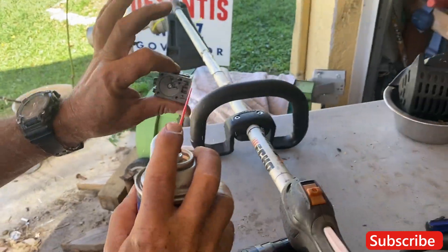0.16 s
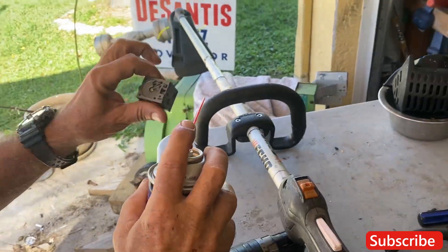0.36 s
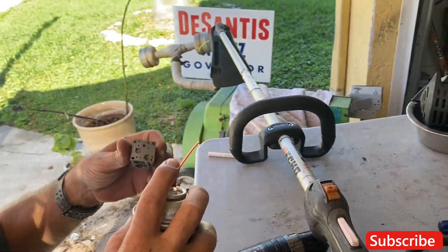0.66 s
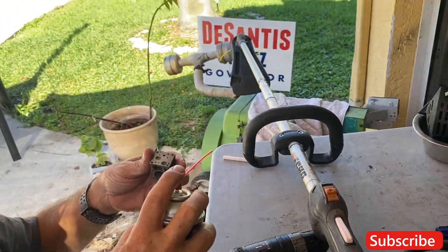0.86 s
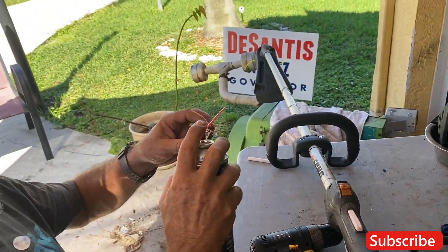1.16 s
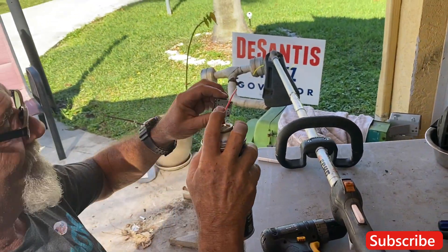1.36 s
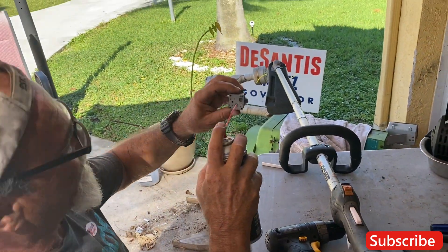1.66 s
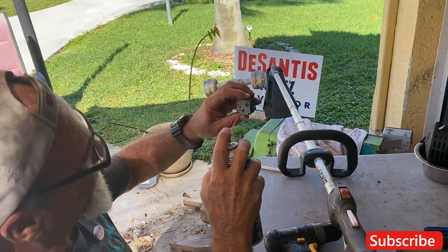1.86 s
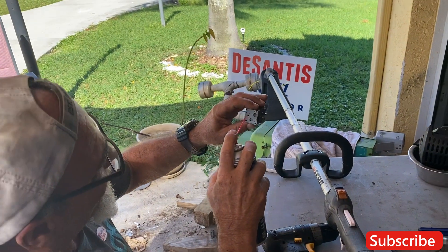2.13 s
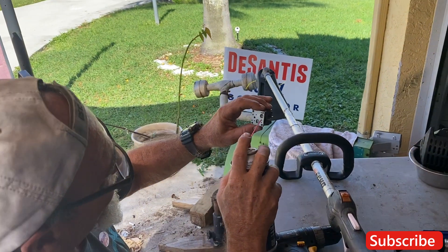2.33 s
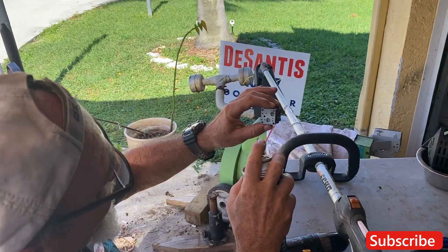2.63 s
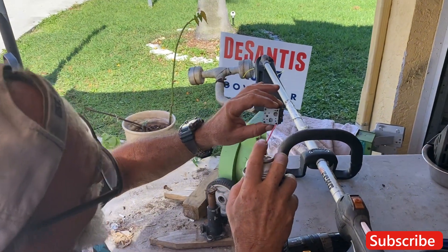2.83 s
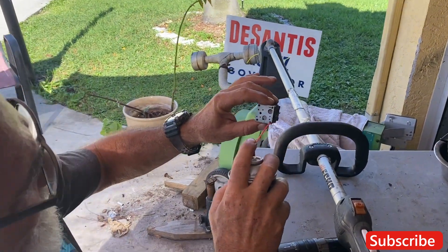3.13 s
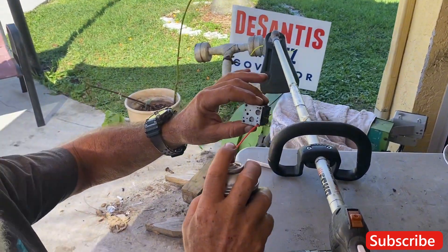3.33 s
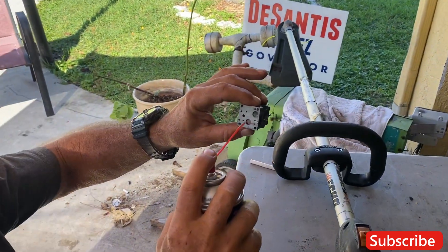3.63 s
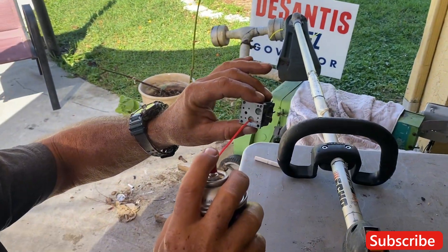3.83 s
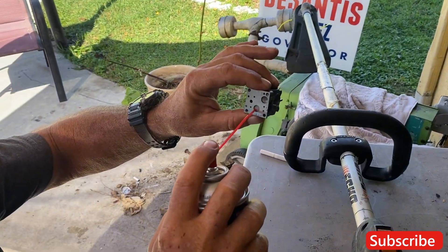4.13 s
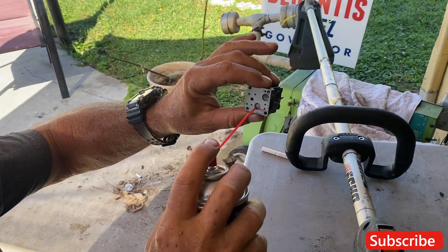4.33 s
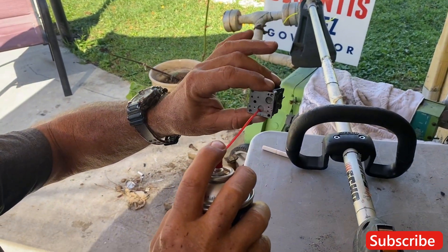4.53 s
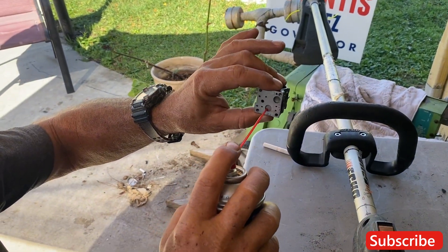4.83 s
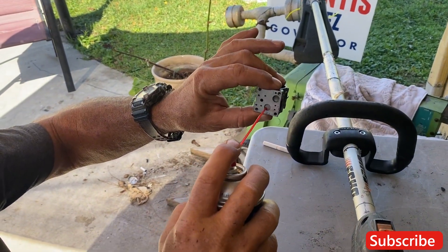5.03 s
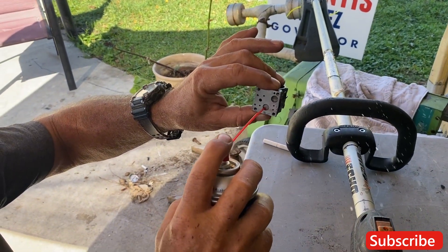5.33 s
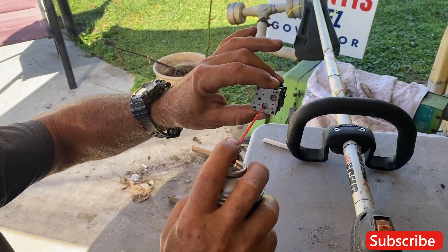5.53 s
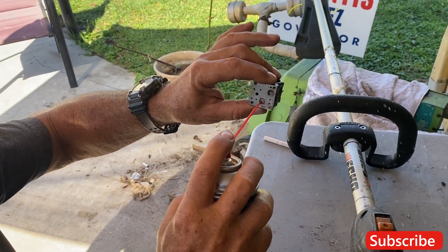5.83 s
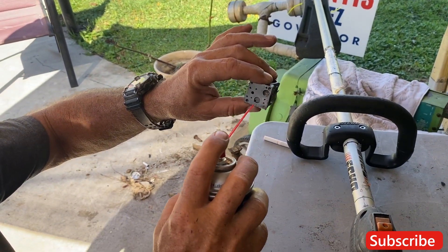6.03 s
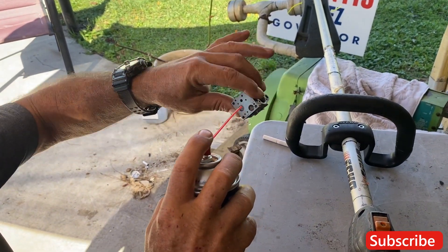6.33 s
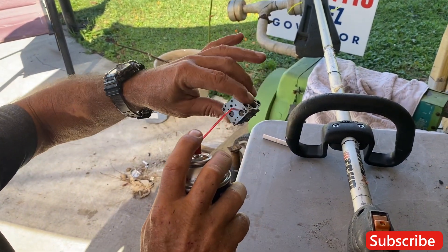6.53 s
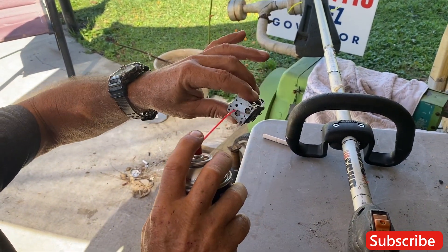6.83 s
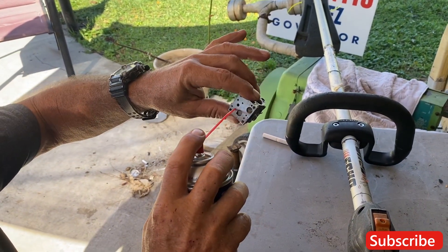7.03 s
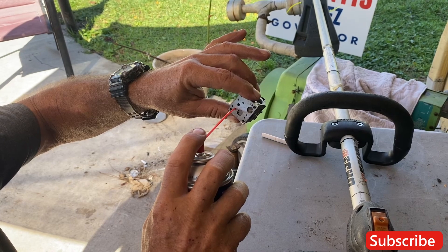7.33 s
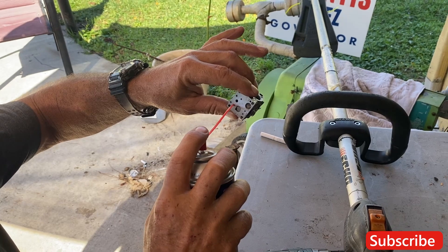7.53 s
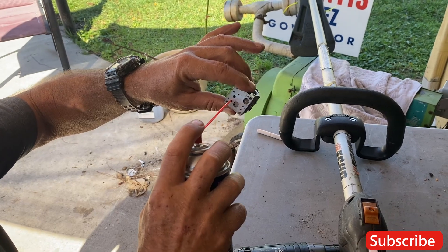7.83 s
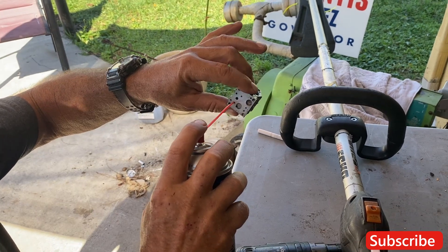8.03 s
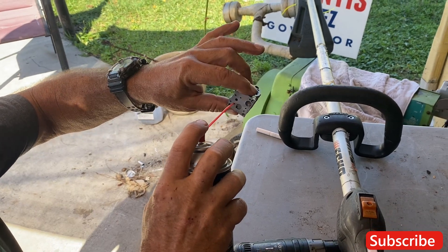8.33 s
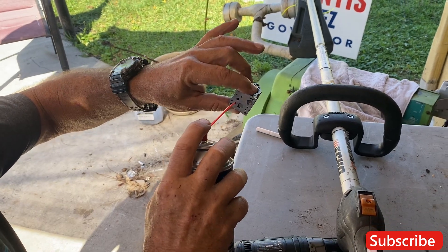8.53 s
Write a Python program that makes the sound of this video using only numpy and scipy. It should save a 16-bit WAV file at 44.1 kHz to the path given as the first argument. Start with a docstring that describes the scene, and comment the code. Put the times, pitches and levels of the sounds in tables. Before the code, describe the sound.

Open porch, close stereo microphone, brief echo, steady soft air and insect fizz, with thin whines strongest in the first four seconds. At 0.1 s a hollow can tap lands with bumps and low rumble, beside a faint bird note; small clicks and a metallic scratch follow near 0.5. Soft bumps come at 1.4, faint bird notes at 1.8 and 2.8. Skin rubs and groans around 2.4, with a loud bright snap at 2.6. Hollow can taps cluster at 3.35-3.6, then knocks and heavier thuds to 4.6. From 4.8 to 5.5 the valve sputters in tiny whistling spurts, with hissing jets at 5.0, 5.2 and a longer one at 5.6. Strong bumps hit at 5.7-5.8. A sleeve brushes lightly at 6.6-6.9; dull bumps follow at 7.2-7.6. A hard panel bangs left at 8.25, then three whistling spurts finish from 8.4.

```python
"""On an open porch a small carburetor is turned in the hand and cleaned with a spray can through its straw.
First the can taps, arms bump and small parts click and scratch, while insects buzz and a far bird calls.
Fingers then rub and groan; more taps and bumps lead to sputtering, whistling spurts and three full jets.
A sleeve brushes past, parts bump again, a hard panel bangs shut, and the can sputters once more.
Struck bodies are decaying modes and coloured noise; spray is noise through bores; air is steady noise."""
import sys
import numpy as np
from scipy import signal
from scipy.fft import rfft, irfft, next_fast_len
from scipy.io import wavfile
from scipy.ndimage import uniform_filter1d, map_coordinates

SR = 44100
rng = np.random.default_rng(int(sys.argv[2]) if len(sys.argv) > 2 else 0)


def generate_wav(signal):
    """Clip the signal to [-1, 1] and save it as 16-bit WAV at the path in sys.argv[1]."""
    frames = np.transpose(np.atleast_2d(signal))
    scaled = np.clip(frames, -1, 1) * 32767
    pcm = np.round(scaled).astype(np.int16)
    wavfile.write(sys.argv[1], SR, pcm)


N = 382788

# Table levels are nominal: the layers trim them where they mix.
# bumps of hand and arm: start_s, knock_db, thud_db, hardness (0 soft to 1 hard), rise_s
BUMP_EVENTS = [(0.098, -36, -65, 0.73, 0.0022), (0.138, -37.5, -50, 0.1, 0.0044),
               (0.209, -47, -56, 0.4, 0.0032), (0.474, -43.5, -68, 0.68, 0.004),
               (1.389, -40.5, -47, 0.73, 0.013), (1.505, -35.5, -44.5, 0, 0.0025),
               (1.537, -45, -52, 0, 0.0031), (2.347, -50.5, -72, 0.6, 0.0019),
               (2.404, -56, -72, 0.4, 0.0012), (3.463, -38, -48, 0.64, 0.012),
               (3.645, -43.5, -51, 0.79, 0.0084), (3.816, -37.5, -28, 0.8, 0.0053),
               (3.929, -32, -32.5, 0.83, 0.0091), (4.455, -30.5, -30, 0.62, 0.0058),
               (4.56, -32.5, -39.5, 0.75, 0.0086), (4.614, -52, -34.5, 1, 0.0039),
               (5.721, -31.5, -24.5, 0.88, 0.0015), (5.822, -35, -36.5, 0.93, 0.01),
               (7.232, -40, -33.5, 0.83, 0.0093), (7.318, -36, -35, 0.9, 0.035),
               (7.612, -44.5, -34, 0.1, 0.0046)]
# dull colour of a knock on the bench: freq_hz, level_db (per Hz)
KNOCK_COLOUR = [(60, -17), (120, 8), (170, 2), (290, -1), (450, -7.5), (620, -16), (1200, -67)]
# spurts of the half-pressed valve: start_s, length_s, hiss_db, whistle_db, whistle_hz
SPURT_EVENTS = [(4.827, 0.042, -42, -62, 3510), (4.922, 0.04, -46, -46.5, 3340),
                (5.006, 0.024, -40, -50, 3270), (5.038, 0.054, -43, -76, 3450),
                (5.117, 0.03, -44, -49, 3430), (5.183, 0.052, -37, -45.5, 4520),
                (5.319, 0.025, -47, -50, 3470), (5.483, 0.046, -49.5, -52.5, 3270),
                (8.383, 0.044, -42, -46.5, 3500), (8.481, 0.055, -51.5, -39.5, 3350),
                (8.581, 0.071, -44, -54.5, 3330)]
# colour of the spray: freq_hz, level_db (per Hz)
JET_COLOUR = [(300, -8), (1200, -3), (1800, -7.5), (2600, -3.5), (4200, 0), (6000, 2.5), (8000, -1),
              (11000, -1), (14500, 4.5), (15700, -9)]
# resonances of straw and bores: freq_hz, width_hz, level_db
BORE_RESONANCES = [(2480, 130, -5), (3380, 150, -1), (4250, 260, 1), (4900, 170, 0), (6500, 220, -10),
                   (8020, 260, -9), (13300, 1200, -12)]


def amp(db):
    """Decibels to gain."""
    return 10 ** (np.asarray(db) / 20)


def unit(x):
    """x at rms 1."""
    return x / np.sqrt(np.mean(x ** 2) + 1e-20)


def along(points, hz):
    """(Hz, value) points read on a log frequency axis."""
    f, v = np.transpose(points)
    return np.interp(np.log(hz + 1), np.log(f + 1), v)


def clock():
    """The time of every sample in seconds."""
    return np.arange(N) / SR


def wobble(rate, size=N):
    """A smooth random curve through rate knots a second."""
    knots = rng.standard_normal(int(size * rate / SR) + 4)
    return map_coordinates(knots, [np.arange(size) * rate / SR])


def sine_phase(hz):
    """The running phase in radians of a tone whose pitch curve is hz."""
    return 2 * np.pi * np.cumsum(hz) / SR


def filtered(x, response):
    """x times a response of frequency."""
    size = x.shape[-1]
    padded = next_fast_len(size + 4096)
    return irfft(rfft(x, padded) * response(np.fft.rfftfreq(padded, 1 / SR)), padded)[..., :size]


def noise(spectrum, size=N):
    """Coloured stereo noise of rms 1: mid and side are mixed for a likeness that varies with frequency."""
    # left-right likeness: freq_hz, coherence (-1 to 1)
    likeness = [(60, 0.86), (140, 0.92), (300, 0.45), (800, -0.015), (1400, -0.15), (2400, 0.33),
                (15000, 0.18)]

    def shape(hz):
        turn = np.arccos(along(likeness, hz)) / 2
        return amp(along(spectrum, hz)) * np.array([np.cos(turn), np.sin(turn)])

    mid, side = filtered(rng.standard_normal((2, size)), shape)
    return unit(np.array([mid + side, mid - side]))


def ports(hz, lead_s):
    """The response of the two microphone ports to a sound that reaches the left one lead_s earlier."""
    return np.exp(1j * np.pi * hz * lead_s * np.array([[1], [-1]]))


def aimed(spectrum, size, lead_s, diffuse_db):
    """Coloured noise of rms 1 from one direction, with a diffuse part around it."""
    ray = filtered(rng.standard_normal(size), lambda hz: amp(along(spectrum, hz)) * ports(hz, lead_s))
    return unit(unit(ray) + amp(diffuse_db) * noise(spectrum, size=size))


def strike(t, rise, t60):
    """An envelope that climbs to 1 in rise seconds and then falls 60 dB in t60 seconds."""
    return np.minimum(t / (rise + 1e-5), 1) * amp(-60 * np.maximum(t - rise, 0) / (t60 + 1e-4))


def gate(length, rise, t60):
    """A quarter-second envelope that opens, holds until length, and closes with a decaying tail."""
    t = np.arange(SR // 4) / SR
    return np.clip(t / rise, 0, 1) * amp(-60 * np.maximum(t - length, 0) / t60)


def arch(s, length):
    """A movement that gathers and eases off, from s for length seconds."""
    return np.sin(np.pi * np.clip((clock() - s) / length, 0, 1))


def pan(left_db):
    """Gains of the two channels, left_db apart."""
    return amp([[left_db / 2], [-left_db / 2]])


def add(out, s, x):
    """Mix x into out at s seconds."""
    part = out[:, max(round(s * SR), 0):][:, :x.shape[-1]]
    part += x[..., :part.shape[1]]


def ringing(modes, t, t60):
    """The modes of a struck body, a little different in pitch and level at every blow."""
    ring = 0
    for hz, db in modes:
        pitch = hz * (1 + 0.01 * rng.standard_normal())
        ring = ring + amp(db + 2 * rng.standard_normal()) * np.sin(2 * np.pi * pitch * t)
    return ring * strike(t, 0.0021, t60)


def resonant(resonances, size, detune, flutter_db):
    """Stereo noise ringing in resonances that flutter in level; detune shifts them a little each time."""
    out = 0
    for hz, width, db in resonances:
        centre = hz * (1 + detune * rng.standard_normal())
        raw = rng.standard_normal((2, size))
        note = unit(filtered(raw, lambda f: 1 / (1 + 1j * (f - centre) / width) ** 2))
        out = out + amp(db + flutter_db * wobble(45, size=size)) * note
    return unit(out)


def patchy(x, depth_db):
    """x with narrow bands that slowly swell and fade."""
    z = signal.stft(x, nperseg=1024)[2]
    across_bands = uniform_filter1d(rng.standard_normal(z.shape[1:]), size=3, axis=0)
    field = uniform_filter1d(across_bands, size=40, axis=1)
    return signal.istft(z * amp(depth_db * unit(field)))[1][:, :N]


def chorus():
    """Loudness of the insects' fizz: a quick swell, a hold and a long fade."""
    # times of reaching full voice: start_s
    full_voice = [0.052, 8.55]
    full_db, hold_s, swell_db_per_s, fade_db_per_s = -62.5, 3.98, 17.5, 5
    t = clock()
    drops = [swell_db_per_s * np.maximum(s - t, 0) + fade_db_per_s * np.maximum(t - s - hold_s, 0)
             for s in full_voice]
    return amp(full_db - np.min(drops, axis=0))


def whine():
    """Each insect gives thin lines at multiples of its click rate; they drift together and swell one by one."""
    # whining insects: start_s, length_s, level_db, clicks_per_s
    insects = [(0.02, 1.5, -64, 283), (0.6, 3.5, -62.5, 263.5), (1.0, 3.0, -65.5, 215.5)]
    # colour of the whine: freq_hz, level_db
    colour = [(3300, -25), (4000, 0), (7700, -1), (9200, -13)]
    flat_share, settle_s, swell_db = .03, .22, 4.3  # each whine starts flat and comes up to pitch
    out = np.zeros((2, N))
    for s, length, db, rate in insects:
        age = clock()[:int(length * SR)]
        waver = .0026 * wobble(2, size=len(age)) + .0018 * wobble(90, size=len(age))
        turns = sine_phase(rate * (1 + waver - flat_share * np.exp(-age / settle_s)))
        knots, voice = np.arange(0, length + .5, .25), 0
        for k in np.arange(colour[0][0] // rate, colour[-1][0] // rate):
            line_db = np.interp(age, knots, swell_db * rng.standard_normal(len(knots)))
            line = np.sin(k * turns + rng.uniform(0, 2 * np.pi, (2, 1)))
            voice = voice + amp(along(colour, k * rate) + line_db) * line
        presence = np.sqrt(np.abs(np.sin(np.pi * age / length)))
        add(out, s, amp(db) * presence * unit(voice))
    return out


def outdoors():
    """Nearly steady air noise, with thin insect lines that drift, come and go over a patchy fizz."""
    # colours of the air and of the insects' fizz, each: freq_hz, level_db (per Hz)
    air_colour = [(30, -36), (60, 2.5), (120, 4.5), (220, -2.5), (400, -8), (780, -7.5), (1300, -18.5),
                  (2500, -24.5), (6000, -31.5), (9000, -85), (15800, -89)]
    fizz_colour = [(2000, -7), (3300, -6), (4200, 0), (6500, -2.5), (8400, 0), (10000, -23.5),
                   (12500, -10.5), (15500, -32)]
    air = amp(-53.5 + 1.2 * wobble(4.7)) * noise(air_colour)
    return air + whine() + chorus() * patchy(noise(fizz_colour), depth_db=3.9)


def bird():
    """A far bird gives a few thin notes, level or gliding, with a fluttering loudness."""
    # bird notes: start_s, length_s, level_db, pitch_hz, glide_hz_per_s
    notes = [(0.0, 0.073, -58, 1780, -1300), (1.76, 0.07, -66.5, 2780, 0), (2.8, 0.17, -64.5, 2820, 500)]
    out, t = np.zeros((2, N)), np.arange(SR // 4) / SR
    for s, length, db, hz, glide in notes:
        phase = sine_phase(hz + glide * t + 130 * wobble(600, size=len(t)))
        flutter = unit(amp(2.2 * wobble(138, size=len(t))))
        add(out, s, amp(db) * flutter * gate(length, rise=0.0057, t60=0.1) * np.sin(phase))
    return out


def porch(x):
    """Roof and wall answer briefly: noise decaying at its own rate in each band, convolved with x."""
    # decay of the porch: freq_hz, t60_s
    decay = [(150, 0.052), (700, 0.14), (2500, 0.23), (6000, 0.26), (14000, 0.1)]
    hz, t, z = signal.stft(rng.standard_normal((2, SR // 2)), SR, nperseg=256)
    tail = signal.istft(z * amp(-60 * t / along(decay, hz)[:, None]), SR, nperseg=256)[1]
    return signal.fftconvolve(x, tail / np.linalg.norm(tail[0]), axes=1)[:, :N]


def sway():
    """The microphone rumbles on after every thud, settling slowly, and rocks when weight is shifted."""
    # colour of the rumble: freq_hz, level_db (per Hz)
    rumble_colour = [(20, -3), (40, -0.5), (56, 4), (75, 6.5), (110, -6), (170, -15), (300, -52.5)]
    # shifts of weight: start_s, length_s, level_db, pitch_hz
    shifts = [(-0.05, 0.26, -38, 47.7), (5.18, 0.42, -42.5, 59.5), (5.995, 0.82, -51, 61.6)]
    rest_db, stir_db, settle_db_per_s = -71.5, -16, 10  # stir is relative to the bump's thud_db
    t = clock()
    power = amp(rest_db) ** 2
    for s, _, thud_db, _, _ in BUMP_EVENTS:
        stirred = amp(thud_db + stir_db - settle_db_per_s * np.abs(t - s)) * (t > s)
        power = power + stirred ** 2
    rumble = np.sqrt(power) * unit(noise(rumble_colour) * amp(6.6 * wobble(14)))
    for s, length, db, hz in shifts:
        phase = sine_phase(hz * (1 + 0.26 * wobble(70)))
        rumble = rumble + amp(db + 4.2 * wobble(22)) * arch(s, length) * np.sqrt(2) * np.sin(phase)
    return rumble


def knock(t, rise):
    """The dull answer of the bench."""
    return noise(KNOCK_COLOUR, size=len(t)) * strike(t, rise, 0.27)


def scuff(t, rise):
    """A short, grainy slip of skin or cloth that reaches the left port first."""
    # colour of a scuff: freq_hz, level_db (per Hz)
    colour = [(400, 3), (900, 7.5), (2000, 7.5), (4500, 1), (8000, -3.5), (10000, -12.5), (13000, -8.5),
              (16000, -26)]
    grains = amp(1.3 * wobble(501, size=len(t)))
    slip = aimed(colour, size=len(t), lead_s=0.00025, diffuse_db=1.5)
    return unit(slip * grains) * strike(t, rise, 0.25)


def bumps():
    """Each bump rocks the microphone mount and knocks on the bench; a harder one clacks and scuffs more."""
    # the rocking microphone mount: freq_hz, level_db, t60_s
    mount_modes = [(57.6, 0.5, 0.31), (82.2, -9, 0.31), (120.6, -6, 0.1), (160.3, -11.5, 0.22)]
    # what the bench rings with under a soft bump: freq_hz, level_db
    bench_modes = [(150, -5), (232, -2.5), (291, 3.5)]
    # colour of the clack: freq_hz, level_db (per Hz)
    clack_colour = [(250, -2), (460, 6), (750, 4), (1000, 1), (1400, -6), (2500, -44)]
    # levels at full hardness, and the loss at full softness
    clack_db, clack_soft_db, scuff_db, scuff_soft_db = 0, 18.5, 1, 41.5
    out, t = np.zeros((2, N)), np.arange(SR // 2) / SR
    for s, db, thud_db, hardness, rise in BUMP_EVENTS:
        thud = 0
        for hz, mode_db, life in mount_modes:
            pitch = hz * np.exp(0.073 * rng.standard_normal())
            thud = thud + amp(mode_db) * strike(t, 0.02, life) * np.sin(2 * np.pi * pitch * t)
        soft = 1 - hardness
        bench = amp(3.0) * soft * ringing(bench_modes, t, t60=0.087)
        wood = amp(1.5) * knock(t, rise + 0.00073) + bench
        clack = noise(clack_colour, size=len(t)) * strike(t, rise, 0.23)
        contact = wood + amp(clack_db - clack_soft_db * soft) * clack
        contact = contact + amp(scuff_db - scuff_soft_db * soft) * scuff(t, rise + 0.0042)
        add(out, s, amp(thud_db + 5.5) * thud + amp(db) * pan(0.46) * contact)
    return out


def brushes():
    """The sleeve scuffs past with a slow-rising scuff and knock, and no thud."""
    # passes of the sleeve: start_s, level_db
    passes = [(6.606, -56), (6.72, -59), (6.921, -47)]
    out, t = np.zeros((2, N)), np.arange(SR // 2) / SR
    for s, db in passes:
        add(out, s, amp(db) * (scuff(t, rise=0.021) + amp(-2) * knock(t, rise=0.013)))
    return out


def rubbing():
    """Skin slides over the can in fine grains, stroke by stroke; where it grips it groans faintly."""
    # strokes of fingers and sleeve: start_s, length_s, level_db
    strokes = [(2.127, 0.29, -56), (2.376, 0.3, -47.5), (3.095, 0.11, -54.5), (3.404, 0.7, -56),
               (8.064, 0.5, -53.5)]
    # a finger grips and slips: start_s, length_s, level_db, pitch_hz
    grips = [(2.387, 0.25, -51.5, 272), (2.4, 0.13, -57, 401)]
    # colour of sliding skin: freq_hz, level_db (per Hz)
    slide_colour = [(150, -25), (270, -2), (500, -4), (1000, -3), (2500, -6), (4500, -11), (8000, -28.5)]
    speed = sum(amp(db) * arch(s, length) for s, length, db in strokes)
    groan = 0
    for s, length, db, hz in grips:
        groan = groan + amp(db) * arch(s, length) * np.sin(sine_phase(hz + 20 * wobble(110)))
    grains = amp(2.5 * wobble(300) + 2.5 * wobble(1100))
    return speed * unit(noise(slide_colour) * grains) + groan


def bang():
    """A hard panel slams on the left: contact builds for some milliseconds, then its dense modes die."""
    # slams: start_s, level_db
    slams = [(8.255, -5.5)]
    # modes of the panel: freq_hz, level_db
    panel_modes = [(463, 1), (708, 3), (750, 2), (800, -1), (1040, 1), (1580, -7), (1832, -4), (2018, -6),
                   (2301, -5), (2572, -3), (2977, -4)]
    # colour of the crash: freq_hz, level_db (per Hz)
    crash_colour = [(35, -16), (60, 0), (140, 2.5), (220, -7), (360, -13), (470, -4.5), (720, 0),
                    (1000, -7.5), (1400, -8.5), (1850, -3), (2700, -8), (4000, -10), (7500, -15.5),
                    (10000, -23.5), (15800, -25.5)]
    lead_s = 0.000312  # it reaches the left port first
    out, t = np.zeros((2, N)), np.arange(SR // 2) / SR
    for s, db in slams:
        modes = sum(amp(mode_db) * np.sin(2 * np.pi * hz * t + rng.uniform(0, 2 * np.pi))
                    for hz, mode_db in panel_modes)
        ring = unit(filtered(modes, lambda hz: ports(hz, lead_s)))
        rough = amp(1.1 * wobble(680, size=len(t)))
        crash = unit(aimed(crash_colour, size=len(t), lead_s=lead_s, diffuse_db=4.5) * rough)
        contact = amp(db - 9.0) * crash * strike(t, 0.013, 0.22)
        add(out, s, contact + amp(db - 14.0) * ring * strike(t, 0.0036, 0.16))
    return out * pan(1.2)


def taps():
    """Hollow taps: a crisp contact, a rebound some milliseconds later, and the can's modes ringing on."""
    # taps of the can: start_s, level_db, t60_s, crispness_db
    blows = [(0.083, -23, 0.094, -15.5), (3.35, -28.5, 0.096, 3), (3.387, -30, 0.16, 2),
             (3.449, -30, 0.15, 0), (3.563, -36.5, 0.19, -6)]
    # what the can rings with: freq_hz, level_db
    can_modes = [(296, -3), (560, -0.5), (790, -2.5), (875, -12.5), (1200, -13)]
    # colour of the contact: freq_hz, level_db (per Hz)
    contact_colour = [(200, -15), (600, 0.5), (1300, -1.5), (1740, -9), (2300, -11.5), (9000, -38),
                      (12000, -38)]
    out, t = np.zeros((2, N)), np.arange(SR // 4) / SR
    for s, db, t60, crisp_db in blows:
        since_rebound = np.maximum(t - rng.uniform(0.0047, 0.01), 0)
        touches = strike(t, 0.00051, 0.018) + 0.25 * strike(since_rebound, 0.00042, 0.015)
        touches = touches + 0.5 * strike(t, 0.0027, t60)
        contact = amp(crisp_db - 2.0) * noise(contact_colour, size=len(t)) * touches
        ring = amp(-7.5) * ringing(can_modes, t, t60)
        body = amp(-19.0) * noise(KNOCK_COLOUR, size=len(t)) * strike(t, 0.0076, 0.78)
        add(out, s, amp(db) * (contact + ring + body))
    return out * pan(0.77)


def clicks():
    """Small parts snap: a thin crack, a few cycles of one resonance, then scatter from the bench."""
    # small hard contacts: start_s, level_db, pitch_hz, scatter_db
    contacts = [(0.1098, -39.5, 8700, -21), (0.4798, -36.5, 7400, -2), (0.519, -38, 1290, 6.5),
                (0.5457, -32, 2020, 5.5), (2.1793, -35.5, 1040, 0), (2.5829, -17, 2770, -26),
                (3.6914, -40, 5450, 2), (3.748, -38.5, 4260, 0), (7.812, -45, 1900, -12)]
    crack_db, crack_db_per_octave = -33, 13.5  # at 2 kHz; the higher the part, the stronger its crack
    out, t = np.zeros((2, N)), np.arange(SR // 4) / SR
    for s, db, hz, scatter_db in contacts:
        snap = np.sin(2 * np.pi * hz * t) * strike(t, 0.00016, 0.0034)
        crack_gain = amp(crack_db + crack_db_per_octave * np.log2(hz / 2000))
        crack = crack_gain * rng.standard_normal((2, len(t))) * strike(t, .0001, 0.0067)
        around = [(hz / 4, -14), (hz * 0.84, -8), (hz, 2), (hz * 1.08, -6), (hz * 2, -12), (hz * 4, -30)]
        fading = strike(t, 0.00063, 0.014) + 0.33 * strike(t, 0.01, 0.19)
        scatter = noise(around, size=len(t)) * fading
        add(out, s, amp(db) * (snap + crack + amp(scatter_db - 11.0) * scatter))
    return out * pan(-0.93)


def scratches():
    """A metal edge catches and slips unevenly over metal, ringing the carburetor's body."""
    # scratches: start_s, level_db, t60_s
    slides = [(0.545, -41, .13), (2.589, -43, .09)]
    # what the carburetor rings with: freq_hz, width_hz, level_db
    body = [(1980, 140, -4), (2330, 300, -1), (3380, 900, -5)]
    out, t = np.zeros((2, N)), np.arange(SR // 4) / SR
    for s, db, t60 in slides:
        slips = unit(amp(3 * wobble(260, size=len(t))))
        ring = resonant(body, size=len(t), detune=0, flutter_db=12.5)
        add(out, s, amp(db) * strike(t, 0.002, t60) * slips * ring)
    return out


def whistle():
    """In each spurt the stream sings across a bore, then breaks into a brief, hoarser note near 4.5 kHz."""
    held_share, leap_hz = 0.79, 4450  # the first note holds for this share of a spurt
    out = np.zeros((2, N))
    for s, length, hiss_db, db, hz in SPURT_EVENTS:
        held = length * held_share
        sung = (s, held, db, hz, 28)
        leap = (s + held, length - held, (db + hiss_db) / 2, leap_hz * rng.uniform(.97, 1.08), 170)
        for start, span, note_db, note_hz, waver_hz in [sung, leap]:
            phase = sine_phase(note_hz + waver_hz * wobble(690, size=SR // 4))
            overtones = amp(-17) * np.sin(2 * phase) + amp(-20) * np.sin(4 * phase)
            tone = np.sqrt(2) * (np.sin(phase) + overtones)
            flutter = unit(amp(2 * wobble(350, size=len(tone))))
            add(out, start, amp(note_db) * gate(span, rise=0.014, t60=0.026) * flutter * tone)
    return out * pan(-4)


def spurts():
    """A half-open valve spits droplets through straw and bores; the liquid retunes each bore every spurt."""
    out, size = np.zeros((2, N)), SR // 4
    for s, length, db, _, _ in SPURT_EVENTS:
        gurgle = amp(3 * wobble(160, size=size))
        bores = unit(gurgle * resonant(BORE_RESONANCES, size=size, detune=.03, flutter_db=5))
        droplets = unit(amp(4 * wobble(1200, size=size)) * noise(JET_COLOUR, size=size))
        spit = bores + amp(-8) * droplets
        add(out, s, amp(db - 1.5) * gate(length, rise=0.0062, t60=0.077) * spit)
    return out * pan(-1.3)


def jets():
    """The valve opens: the bores sound first, then a broad hiss swells over them, rough with droplets."""
    # the valve fully open: start_s, length_s, level_db, opening_s
    openings = [(5.035, 0.072, -40.5, 0.059), (5.197, 0.097, -31.5, 0.047), (5.621, 0.15, -32, 0.074)]
    out, size = np.zeros((2, N)), SR // 4
    for s, length, db, opening in openings:
        flow = gate(length, rise=opening, t60=0.16)
        broad = unit(aimed(JET_COLOUR, size=size, lead_s=-0.000032, diffuse_db=2.0))
        bores = resonant(BORE_RESONANCES, size=size, detune=.03, flutter_db=5)
        droplets = unit(amp(2 * wobble(700, size=size) + 1.4 * wobble(110, size=size)))
        # squared flow makes the hiss lag behind the bores
        spray = amp(db + 1.5) * flow ** 2 * broad + amp(db - 4.5) * flow * bores
        add(out, s, droplets * spray)
    return out


def scene():
    """Near sounds with their porch echo over the outdoor floor; the can echoes less, the bird is all echo."""
    handling = bumps() + brushes() + clicks() + scratches() + taps() + bang() + rubbing()
    can = spurts() + jets() + whistle()
    echo = porch(amp(-8.5) * handling + amp(-13.5) * can + bird())
    return handling + can + echo + sway() + outdoors()


def record(dry):
    """Each microphone port has its own colour, and neither keeps anything above the band limit."""
    # difference of the ports: freq_hz, left_minus_right_db
    port_difference = [(120, 0), (600, 1.5), (2500, -2), (13000, 0)]
    top_hz = 15850

    def response(hz):
        return amp(np.outer([.5, -.5], along(port_difference, hz))) * (hz < top_hz)

    return filtered(dry, response)


dry = scene()
out = record(dry)
generate_wav(out)
```